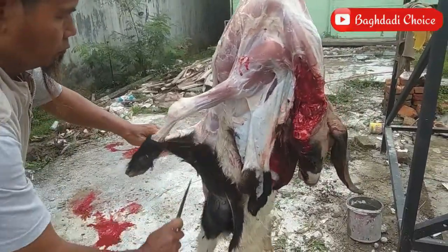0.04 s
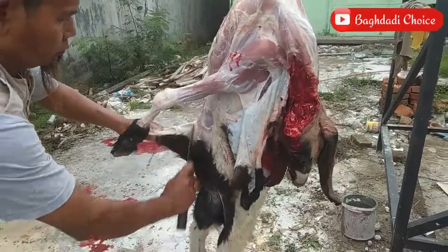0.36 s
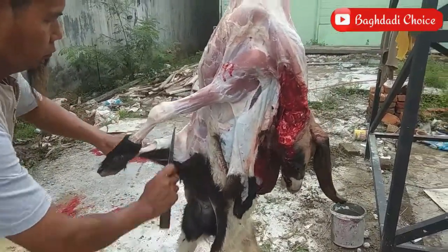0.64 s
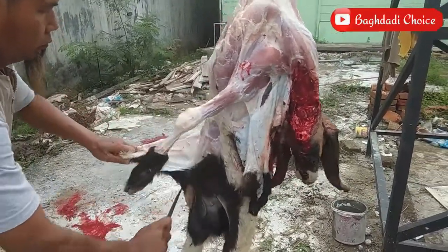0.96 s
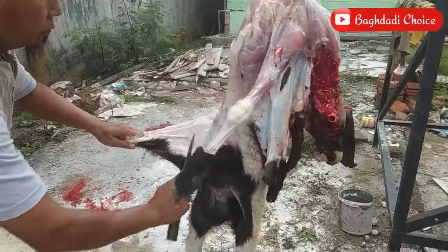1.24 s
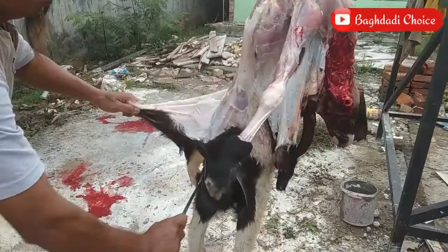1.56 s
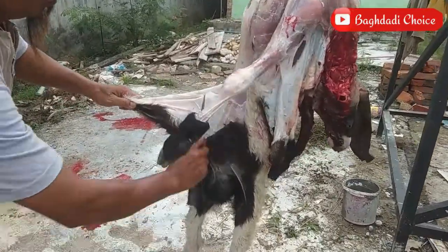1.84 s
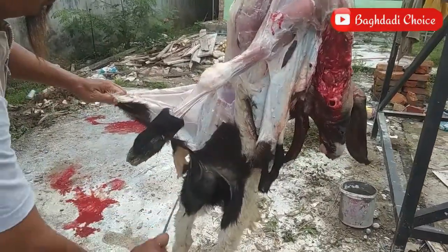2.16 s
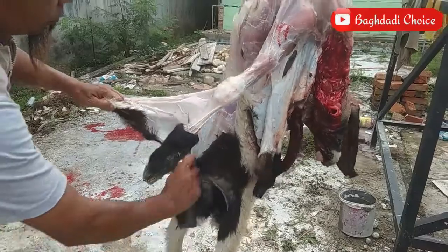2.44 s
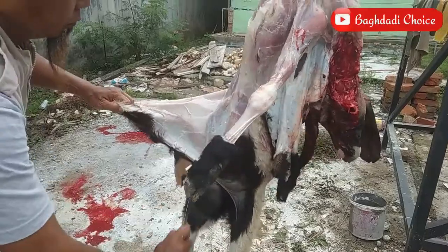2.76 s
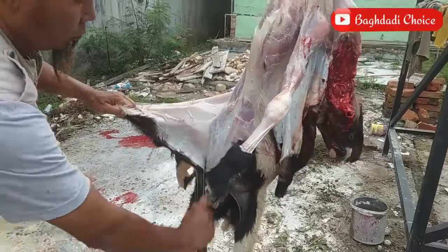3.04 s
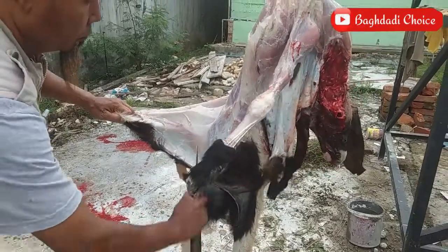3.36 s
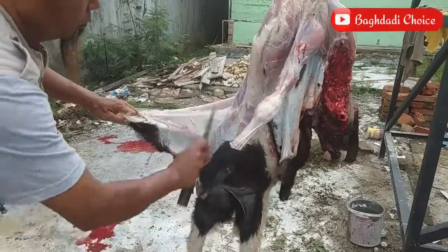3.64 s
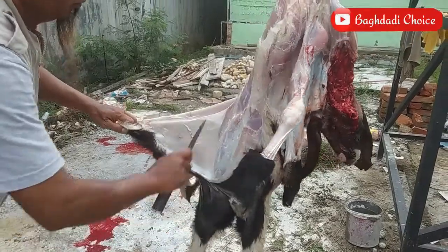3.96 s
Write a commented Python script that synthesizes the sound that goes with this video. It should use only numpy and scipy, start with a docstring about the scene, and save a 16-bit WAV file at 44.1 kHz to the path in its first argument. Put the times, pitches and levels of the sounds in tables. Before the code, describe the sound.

A broom sweeps concrete in slow, regular swishes, slightly to the left. Between and over the strokes, a nearby knife skins a carcass with short gritty cuts, faint crackles and wet taps, above a yard's low distant rumble.

```python
"""A yard: a knife skins a hanging carcass. The blade catches on fibres in short gritty cuts,
the pulled hide crackles, soft wet taps sound and a fist bumps the carcass once.
Off to the left a slow, regular swish of bristles swells and fades, probably a broom on concrete.
Under it lie a low, distant rumble and faint outdoor hiss."""
import sys
import numpy as np
from scipy import signal
from scipy.fft import rfft, irfft, next_fast_len
from scipy.io import wavfile
from scipy.ndimage import uniform_filter1d, map_coordinates

SR = 44100
rng = np.random.default_rng(int(sys.argv[2]) if len(sys.argv) > 2 else 0)


def dump(signal):
    """Clip the signal to [-1, 1] and save it as 16-bit WAV at the path in sys.argv[1]."""
    limited = np.clip(np.atleast_2d(signal).T, -1, 1)
    pcm = np.round(limited * 32767).astype(np.int16)
    wavfile.write(sys.argv[1], SR, pcm)


N = 176400
TIME_S = np.arange(N) / SR


def amp(db):
    """dB to gain."""
    return 10 ** (np.asarray(db) / 20)


def unit(x):
    """x at rms 1."""
    return x / np.sqrt(np.mean(x ** 2) + 1e-20)


def along(points, hz):
    """Interpolate (f/Hz, value) points on a log axis."""
    f, values = np.transpose(points)
    return np.interp(np.log(hz + 1), np.log(f + 1), values)


def wobble(rate_hz):
    """Smooth random curve with knots at rate_hz."""
    return map_coordinates(rng.standard_normal(4096), [TIME_S * rate_hz], mode="wrap")


def filtered(x, response):
    """Apply the frequency response response(hz)."""
    size = next_fast_len(N + SR // 4)
    return irfft(rfft(x, size) * response(np.fft.rfftfreq(size, 1 / SR)), size)[..., :N]


def placed(pair, spectrum, likeness, lag_s=0, pan=((1000, 0),), lead=((1000, 0),)):
    """Noise pair to stereo, rms 1. Over f/Hz: spectrum/dB, L-R likeness, pan (L-R)/dB, left lead/rad."""
    half = np.array([[.5], [-.5]])

    def colour(hz):
        angle = np.arccos(np.clip(along(likeness, hz), -1, 1)) / 2
        return amp(along(spectrum, hz)) * [np.cos(angle), np.sin(angle)]

    def direction(hz):
        phase = along(lead, hz) - 2 * np.pi * hz * lag_s
        return amp(half * along(pan, hz)) * np.exp(1j * half * phase)

    mid, side = filtered(pair, colour)
    return unit(filtered(np.array([mid + side, mid - side]), direction))


def grit(slips_per_s, slip_share):
    """Two trains of tiny random slips over smooth friction noise."""
    slips = (rng.random((2, N)) < slips_per_s / SR) * rng.standard_normal((2, N))
    return np.sqrt(slip_share) * unit(slips) + np.sqrt(1 - slip_share) * rng.standard_normal((2, N))


def patchy(pair, depth_db):
    """Random, fast-flickering patches of colour that make the hiss raspy."""
    bins = signal.stft(pair, nperseg=512)[2]
    field = uniform_filter1d(rng.standard_normal(bins.shape[1:]), size=3, axis=0)
    field = uniform_filter1d(field, size=10, axis=1)
    return signal.istft(bins * amp(depth_db * unit(field)), nperseg=512)[1][:, :N]


def stroke(start_s, length_s, attack_s, release_s):
    """Pressure builds, holds and lets go."""
    t = TIME_S - start_s
    return (.5 + .5 * np.tanh(2 * t / attack_s)) * np.exp(-np.maximum(t - length_s, 0) / release_s)


def knife():
    """The blade parts fibres in uneven catches: coarse rasp, sharp bite, edge hiss, dull hide body."""
    cuts = [(0.394, 0.052, -54, -51.5, -43.5, -63), (0.446, 0.03, -52, -53, -49.5, -60),
            (0.485, 0.013, -58, -57, -53, -63.5), (0.893, 0.022, -50, -63, -56, -64.5),
            (0.915, 0.026, -45.5, -48.5, -40, -64), (0.946, 0.019, -62, -49, -44, -55.5),
            (0.972, 0.051, -53.5, -54, -44, -60.5), (1.498, 0.066, -49, -55, -63, -62.5),
            (2.038, 0.028, -42, -55, -48, -57.5), (2.064, 0.042, -68, -44.5, -49, -66),
            (2.553, 0.044, -47.5, -50, -45.5, -57), (2.605, 0.029, -58, -44.5, -45, -64.5),
            (2.65, 0.013, -56, -53.5, -48, -90), (3.069, 0.046, -56, -59, -54.5, -59),
            (3.114, 0.018, -55, -48.5, -47.5, -68), (3.138, 0.011, -47.5, -41.5, -50, -68),
            (3.175, 0.023, -53, -60, -46, -90), (3.748, 0.045, -56.5, -49.5, -47, -56.5),
            (3.795, 0.039, -51.5, -51.5, -57, -53)]  # t/s, length/s, rasp/dB, bite/dB, edge/dB, body/dB
    # layer spectra: f/Hz, level/dB
    rasp = [(400, -50), (900, -23), (1350, -4), (1900, 1.5), (2800, -9.5), (4000, -12), (7000, -5),
            (16000, -24)]
    bite = [(1200, -47), (2300, 4.5), (2850, -5), (3400, 5), (4100, 3.5), (4700, 1), (5400, -3),
            (6500, -30), (9000, -6.5), (16000, -12)]
    edge = [(2000, -30), (5400, -12), (6100, -2), (7400, -1.3), (8700, -3), (9600, .3), (10800, -1.5),
            (11800, .5), (13500, -4), (15700, -5.8)]
    body = [(120, 1), (280, 2.5), (430, -3.5), (650, 2.5), (1200, 6), (1900, -3.5), (4000, -50),
            (16000, -43)]
    likeness = [(400, 0.99), (1500, 0.21), (3500, 0.99), (7000, 0.36), (11000, 0.44)]  # f/Hz, L-R likeness
    pan = [(500, -0.5), (1800, -5), (2800, -3), (4200, 8.5), (5500, 0.5), (6600, -0.5), (8400, -9.5),
           (9800, 1.5), (14000, -4.5)]  # f/Hz, L-R/dB
    pressures = np.array([stroke(*cut[:2], attack_s=.012, release_s=.015) for cut in cuts])
    envelopes = amp(np.array(cuts)[:, 2:]).T @ pressures
    catches = amp(1.3 * wobble(rate_hz=170))
    layers = [(rasp, 2500, .83), (bite, 1800, .69), (edge, 4300, .51), (body, 510, .5)]
    out = 0
    for envelope, (spectrum, slips_per_s, slip_share) in zip(envelopes, layers):
        friction = patchy(grit(slips_per_s, slip_share), depth_db=2.1)
        out += envelope * placed(friction, spectrum, likeness, lag_s=7e-5, pan=pan)
    return catches * out


def hide():
    """Damp skin crackles when pulled, and faintly while held taut."""
    pulls = [(0.287, 0.013, -59), (1.015, 0.084, -57.5), (1.184, .02, -57), (1.582, .03, -56.5),
             (1.72, 0.15, -66), (2.27, 0.037, -53.5), (3.602, 0.095, -55), (3.83, 0.059, -59)]  # t/s, length/s, level/dB
    spectrum = [(150, 1.5), (400, -5.5), (900, -3.5), (1800, -1), (3500, -8.5), (7000, -8), (15000, -7.5)]  # f/Hz, level/dB
    taut = amp(-66.5 + 2.3 * wobble(rate_hz=6.39))
    pulled = sum(amp(db) * stroke(start_s, length_s, attack_s=.012, release_s=.03)
                 for start_s, length_s, db in pulls)
    crackle = placed(grit(slips_per_s=900, slip_share=.5), spectrum,
                     likeness=[(400, .71), (2000, .057), (8000, .29)], pan=[(1000, -.94)])
    return (taut + pulled) * crackle


def taps():
    """Wet taps and snapping fibres: one damped push and a little splatter."""
    hits = [(0.2886, -49.5, 920, .035), (0.463, -51, 1100, 0.018), (0.9502, -43, 910, 0.027),
            (0.976, -46, 1400, .015), (1.188, -45.5, 990, 0.014), (1.2, -49, 1100, 0.0085),
            (1.457, -50.5, 900, .014), (1.4978, -46.5, 715, .012), (1.861, -51.5, 1060, 0.015),
            (1.9235, -53, 850, .012), (1.931, -55, 690, 0.017), (1.9987, -46.5, 1300, 0.011),
            (2.054, -37.5, 1430, 0.0097), (2.271, -43, 1360, 0.019), (2.283, -45.5, 1400, 0.028),
            (2.5695, -44.5, 1260, 0.027), (2.868, -37.5, 806, 0.02), (3.821, -45.5, 696, 0.023),
            (3.985, -38.5, 1300, 0.023)]  # t/s, level/dB, f/Hz, t60/s
    push_db, push_cycles, attack_s = -1.5, .44, .00052
    out = np.zeros((2, N + SR))
    t = np.arange(2048) / SR
    f = np.fft.rfftfreq(len(t), 1 / SR)
    for start_s, db, hz, t60_s in hits:
        band = 1 / np.sqrt(1 + np.log2((f + 1) / hz) ** 4)  # one octave each side
        noise = rng.standard_normal(len(t)) + 1.74 * rng.standard_normal((2, len(t)))
        envelope = amp(-60 * t / t60_s) * (1 - np.exp(-t / attack_s))
        splatter = envelope * unit(irfft(rfft(noise) * band))
        dent = np.sin(2 * np.pi * hz * t) * hz * t * np.exp(-hz * t / push_cycles)
        speed = np.gradient(dent)
        push = amp(push_db) * speed / np.abs(speed).max()
        first = round(start_s * SR)
        out[:, first:first + len(t)] += amp(db) * (splatter + push)
    return out[:, :N]


def thud():
    """A fist bumps the carcass: one dull, damped note."""
    start_s, db, hz, t60_s = 1.501, -52, 390, .085
    t = np.maximum(TIME_S - start_s, 0)
    return amp(db - 60 * t / t60_s) * np.sin(2 * np.pi * hz * t)


def broom():
    """Bristles land with a scuff and hiss with swing speed; the lows swell less than the top."""
    sweeps = [(-.05, 0.168, -38.5, 143, 55, -70), (0.69, 0.895, -39, 90, 65, -52),
              (1.333, 1.546, -39.5, 143, 56.5, -62), (1.937, 2.113, -41, 110, 66.5, -58),
              (2.672, 2.853, -38.5, 123, 64.5, -69), (3.363, 3.578, -36.5, 164, 77, -72)]  # landing/s, peak/s, level/dB, rise/(dB/s), fall/(dB/s), scuff/dB
    spectrum = [(200, -22), (800, -12.5), (1200, -9), (2000, -9), (2500, -9), (3000, -8.5), (3700, -6.8),
                (4200, -7.8), (4750, -12), (5600, -10.3), (6300, -7), (6800, -7), (7500, -10), (8300, -8.3),
                (9800, -3.7), (10900, 0), (11900, -1.2), (13000, -4), (13700, -4.3), (14800, -7.7),
                (15700, -10)]  # f/Hz, level/dB
    likeness = [(500, .9), (1500, 0.87), (1850, 0.69), (2300, 0.3), (3200, 0.05), (4100, 0.022),
                (4500, -0.37), (5500, 0.39), (6800, -0.34), (8000, 0.11), (9700, -0.052), (10900, 0.17),
                (13000, -0.087)]  # f/Hz, L-R likeness
    lead = [(300, .3), (650, 0.74), (1000, 2.7), (1400, 3.5), (1650, 3.56), (1850, 5.1), (2100, 5.4),
            (2600, 6.12)]  # f/Hz, left lead/rad
    pan = [(2000, .34), (6000, .8), (9000, 2.4), (15000, .83)]  # f/Hz, L-R/dB
    turn_s, attack_s = .053, .0035
    knee, split_hz, low_exponent = amp(-39), 5000, .79
    power = scuff = 0
    for land_s, peak_s, db, rise, fall, scuff_db in sweeps:
        contact = .5 + .5 * np.tanh((TIME_S - land_s) / attack_s)
        off_peak_s = np.hypot(TIME_S - peak_s, turn_s) - turn_s  # rounded top
        slope = np.where(TIME_S < peak_s, rise, fall)
        power += contact * amp(db - off_peak_s * slope) ** 2
        scuff += amp(scuff_db) * stroke(land_s, .02, attack_s, release_s=.04)
    level = np.hypot(np.sqrt(power), scuff) * amp(.27 * wobble(rate_hz=35.1))
    speed_db = np.maximum(20 * np.log10(level / knee + 1e-9), -20)
    friction = patchy(grit(slips_per_s=5000, slip_share=.21), depth_db=2.6)
    hiss = placed(friction, spectrum, likeness, pan=pan, lead=lead)
    hiss = unit(bristle_resonance(hiss, speed_db))
    low = filtered(hiss, lambda hz: 1 / (1 + (hz / split_hz) ** 4))
    return level * (hiss - low) + knee * (level / knee) ** low_exponent * low


def bristle_resonance(pair, speed_db):
    """Hollow peak with a steep lower edge; sinks as a faster stroke bends the bristles."""
    base_hz, sink_hz_per_db, width_hz = 1720, 15, 350
    peak_db, below_db = 2.8, -13
    hz, t, bins = signal.stft(pair, SR, nperseg=1024)
    centre_hz = base_hz - sink_hz_per_db * np.interp(t, TIME_S, speed_db)
    detune = (hz[:, None] - centre_hz) / width_hz
    gain_db = peak_db / (1 + detune ** 2) + below_db * (.5 - .5 * np.tanh(2 * (detune + 1)))
    return signal.istft(bins * amp(gain_db), SR, nperseg=1024)[1][:, :N]


def yard():
    """Low rumble, an unsteady drone (perhaps a far engine) and open-air hiss."""
    rumble_spectrum = [(18, -12.5), (28, -5), (40, -6), (50, -11), (60, -3), (70, -10), (100, -13),
                       (130, -15.5), (200, -24), (300, -26), (500, -37), (900, -52), (3000, -103)]  # f/Hz, level/dB
    air_spectrum = [(240, -20), (400, -5), (700, -7), (1400, -8.5), (2200, -8), (3500, -9.5), (5000, -11),
                    (8000, -10), (11000, -6.5), (13000, -9), (15700, -17)]  # f/Hz, level/dB
    drone_levels = [(0, -62.5), (.2, -51.5), (.55, -58.5), (0.952, -57.5), (1.25, -57.5), (1.752, -53),
                    (2.0, -56.5), (2.5, -56), (2.7, -61), (3.3, -57), (3.55, -60.5), (4, -70)]  # t/s, level/dB
    rumble_db, air_db, drone_hz = -55, -62, 57.75
    rumble = placed(rng.standard_normal((2, N)), rumble_spectrum,
                    likeness=[(60, .94), (125, 1), (250, .84), (600, .94)])
    drone_db = np.interp(TIME_S, *np.transpose(drone_levels)) + .17 * wobble(rate_hz=19)
    phase = 2 * np.pi * drone_hz * TIME_S + .37 * wobble(rate_hz=7.7)
    drone = amp(drone_db) * np.sqrt(2) * np.sin(phase)
    air = placed(rng.standard_normal((2, N)), air_spectrum,
                 likeness=[(400, .28), (1500, .038), (8000, .06)])
    return amp(rumble_db + .81 * wobble(rate_hz=17)) * rumble + drone + amp(air_db) * air


def scene():
    """Stereo sum of all sources."""
    return broom() + knife() + hide() + taps() + thud() + yard()


def record(dry):
    """Brick-wall low-pass."""
    return filtered(dry, lambda hz: hz < 15800)


dry = scene()
out = record(dry)
dump(out)
```